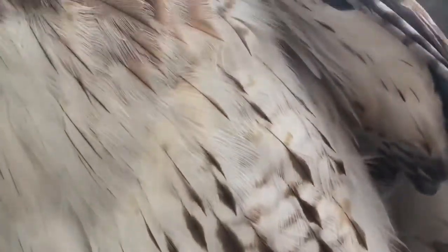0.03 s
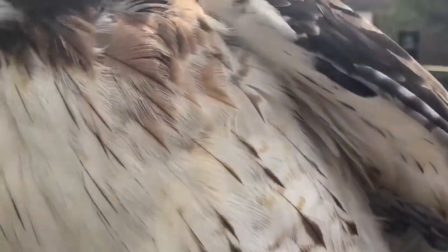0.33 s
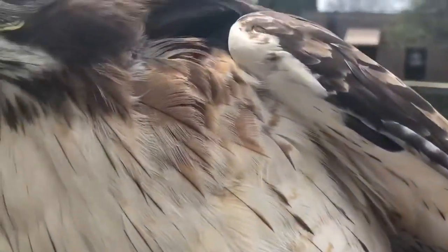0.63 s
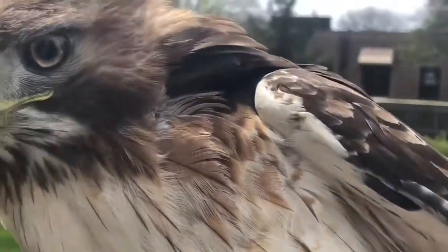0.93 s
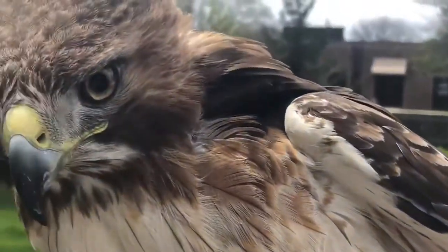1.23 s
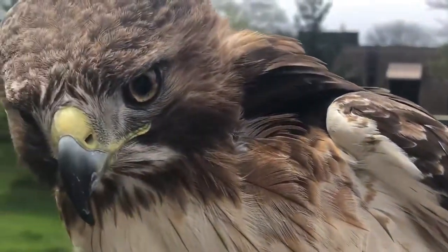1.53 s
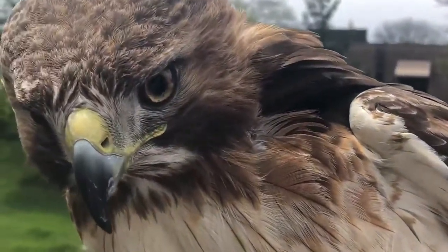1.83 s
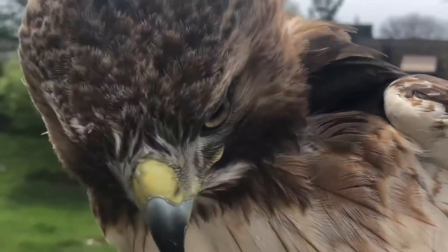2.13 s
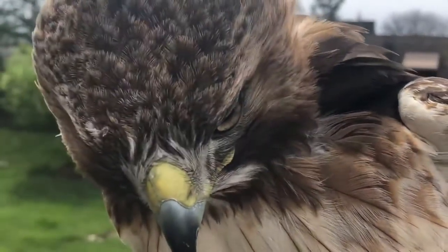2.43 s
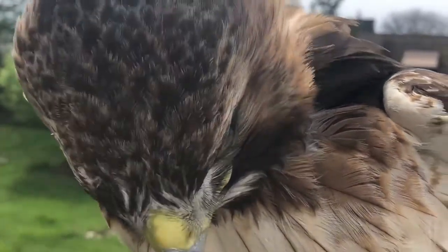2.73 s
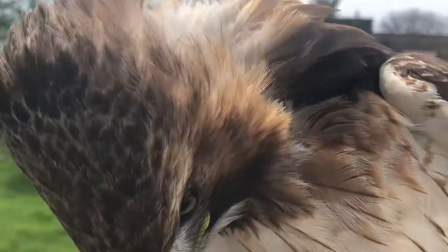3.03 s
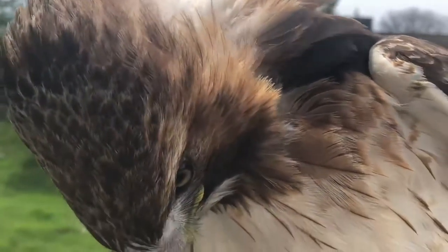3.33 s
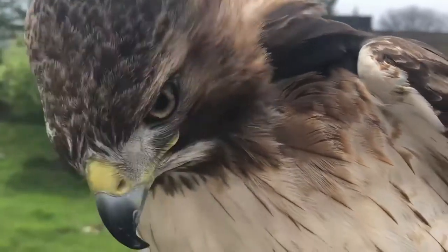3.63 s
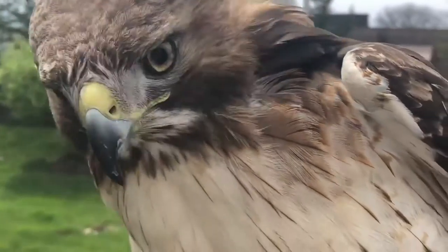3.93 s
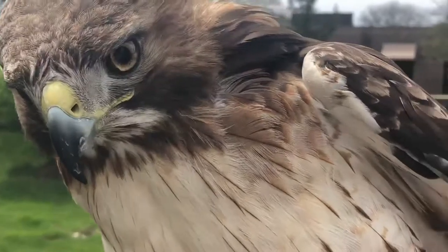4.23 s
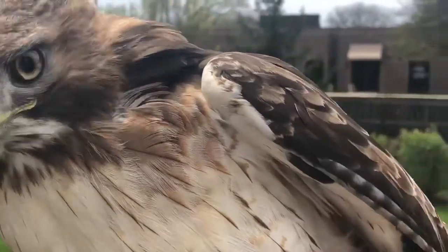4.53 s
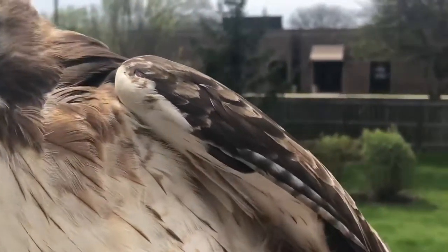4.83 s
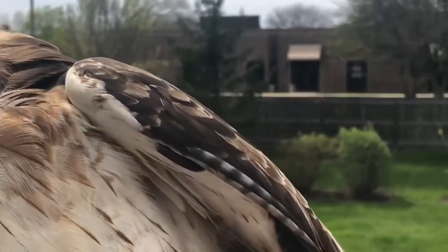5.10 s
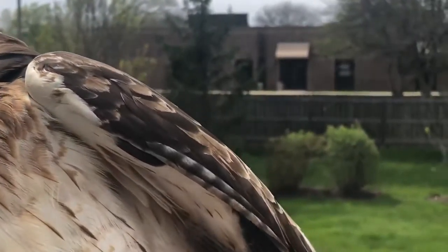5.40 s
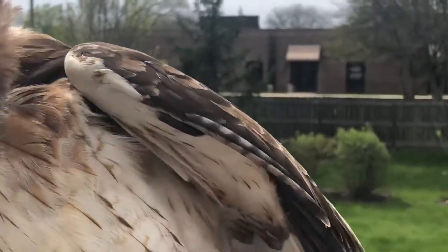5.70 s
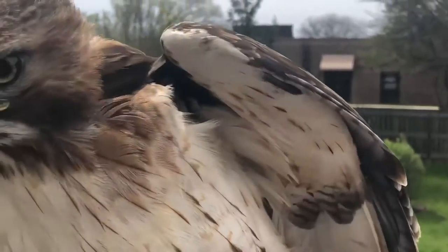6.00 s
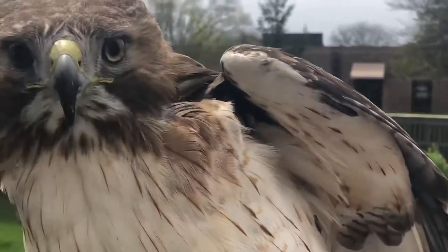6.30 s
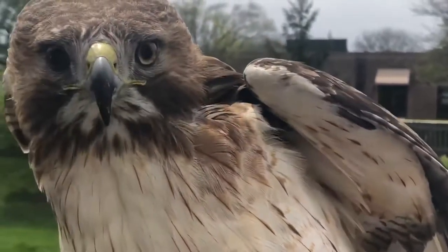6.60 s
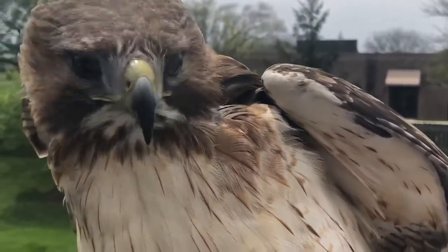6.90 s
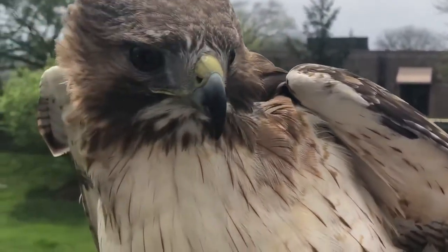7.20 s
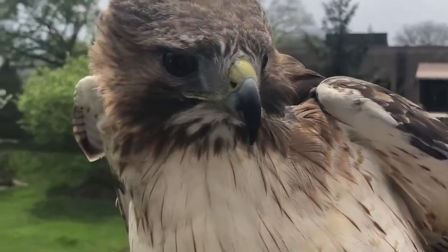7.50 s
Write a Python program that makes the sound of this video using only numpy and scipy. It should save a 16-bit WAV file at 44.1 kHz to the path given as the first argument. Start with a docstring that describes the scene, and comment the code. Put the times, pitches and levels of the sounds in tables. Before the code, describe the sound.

A steady low rumble of distant road traffic, with tyre hiss and a wavering engine drone, fills a back yard. Over it a sparrow gives quick, high chirps, three early and two more after a pause, with faint notes from other birds farther off. One dipping call follows late on. Soft thuds from the hand on the microphone come early and midway, and tiny ticks at the end.

```python
"""Sparrow in a back yard

Heard on a hand-held microphone, a sparrow repeats one quick run of slurred, whistled syllables;
the ground, a fence and houses answer. Softer notes fall between the chirps, small birds call farther
off, and one two-voiced call dips near the end. In the distance tyres hiss on a road and an engine
drones. Right at the microphone, the hand makes a few soft bumps and ticks."""
import sys
import numpy as np
from scipy import signal
from scipy.fft import rfft, irfft, next_fast_len
from scipy.io import wavfile
from scipy.ndimage import uniform_filter1d, map_coordinates

SR = 44100
rng = np.random.default_rng(int(sys.argv[2]) if len(sys.argv) > 2 else 0)


def store_wav(level_fs):
    """Save 16-bit WAV to argv[1]."""
    pcm = np.round(np.clip(np.atleast_2d(level_fs), -1, 1) * 32767)
    wavfile.write(sys.argv[1], SR, pcm.T.astype(np.int16))


N = 332955
TIME = np.arange(N) / SR


def amp(db):
    """Decibels to gain."""
    return 10 ** (np.asarray(db) / 20)


def unit(x):
    """Scaled to rms 1."""
    return x / np.sqrt(np.mean(x ** 2) + 1e-20)


def along(points, hz):
    """(frequency [Hz], value) points read on a log axis."""
    knots_hz, values = np.transpose(points)
    return np.interp(np.log(hz + 1), np.log(knots_hz + 1), values)


def curves(rows, t):
    """Each column after the time, read at the times t."""
    times, *columns = np.transpose(rows)
    return [np.interp(t, times, column) for column in columns]


def wobble(rate, size=N):
    """A smooth random curve, rate knots a second."""
    knots = rng.standard_normal(int(size * rate / SR) + 4)
    return map_coordinates(knots, [np.arange(size) * rate / SR])


def filtered(x, response):
    """x times a response of frequency."""
    size = next_fast_len(N + 8192)
    return irfft(rfft(x, size) * response(np.fft.rfftfreq(size, 1 / SR)), size)[:N]


def coloured(x, colour):
    """x shaped by (frequency [Hz], gain [dB]) points."""
    return filtered(x, lambda hz: amp(along(colour, hz)))


def noise(colour):
    """Noise of rms 1 with the given colour."""
    return unit(coloured(rng.standard_normal(N), colour))


def band(centre_hz, width_hz):
    """Noise of rms 1 in one bell-shaped band."""
    white = rng.standard_normal(N)
    return unit(filtered(white, lambda hz: np.exp(-.5 * ((hz - centre_hz) / width_hz) ** 2)))


def add(track, start, sound):
    """Mix a sound into the track, start seconds in."""
    at = round(start * SR) + np.arange(len(sound))
    inside = (at >= 0) & (at < N)
    track[at[inside]] += sound[inside]


# Colours of the road as heard from the yard: (frequency [Hz], relative level [dB])
RUMBLE_COLOUR = [(20, -35), (45, -8.5), (75, -2.5), (110, 1.5), (150, -3.5), (200, -9), (260, -9.5),
                 (340, -12.5), (450, -24.5), (800, -35.5), (2000, -63)]
ROAR_COLOUR = [(150, -20), (400, -4), (620, -3), (800, 0.5), (950, -1), (1300, -14), (2000, -22.5),
               (5000, -71)]
HISS_COLOUR = [(400, -29.5), (800, -7), (1100, 0.5), (1600, -5), (2100, -15), (3000, -20.5), (4200, -26.5),
               (6000, -32.5), (12000, -59)]
# Road rumble at the microphone: (time [s], level [dB])
RUMBLE_LEVELS = [(0, -43.5), (1.0, -44), (2.5, -45.7), (3.0, -42.5), (4.15, -45.5), (4.7, -42.5),
                 (5.75, -45.5), (6.15, -42.5), (7.55, -44.5)]
# Tyres at the microphone: (time [s], roar level [dB], hiss level [dB])
TYRE_LEVELS = [(0, -53.5, -55), (1.9, -52, -55), (2.75, -51.5, -53.5), (3.7, -52.5, -56.5),
               (5.5, -50.5, -56), (6.5, -52, -56.5), (7.05, -50, -57), (7.55, -52.5, -55)]

def traffic():
    """A distant road: rumble, tyre roar and tyre hiss, each wavering a little."""
    rumble_db, = curves(RUMBLE_LEVELS, TIME)
    roar_db, hiss_db = curves(TYRE_LEVELS, TIME)
    rumble = amp(rumble_db + .92 * wobble(6.2)) * noise(RUMBLE_COLOUR)
    roar = amp(roar_db + .71 * wobble(3.5)) * noise(ROAR_COLOUR)
    hiss = amp(hiss_db + .23 * wobble(8.9)) * noise(HISS_COLOUR)
    return rumble + roar + hiss


# The far engine speeds up: (time [s], length [s], pitch rise [Hz])
ENGINE_REVS = [(-.1, .98, 3.1), (1.268, .22, 2.6), (2.013, .17, 2.8), (2.973, .42, 4), (4.59, 3.1, 1.54),
               (5.549, .12, 1.2), (6.038, .38, 2.6)]
# The lower of its two hums: (time [s], level [dB])
HUM_LEVELS = [(0, -50), (1.7, -55.5), (2.3, -55), (4.4, -56), (5.2, -54.5), (7.55, -49)]

def engine(idle_hz=53.63, idle_db=-48, db_per_hz=1.37, ramp_s=.19):
    """A far engine idles and grows louder whenever it speeds up; two fuzzy hums lie above it."""
    rise_hz = np.zeros(N)
    for start, length, rev_hz in ENGINE_REVS:
        inside_s = np.minimum(TIME - start, start + length - TIME)
        rise_hz += rev_hz * np.clip(.5 + inside_s / ramp_s, 0, 1)
    phase = 2 * np.pi * np.cumsum(idle_hz + rise_hz) / SR + .81 * wobble(18)
    level = amp(idle_db + db_per_hz * rise_hz + 1.2 * wobble(7.7))
    drone = level * (np.sqrt(2) * np.sin(phase) + amp(-7) * band(56, 8.5))
    hum_db, = curves(HUM_LEVELS, TIME)
    return drone + amp(hum_db) * band(168.85, 4.2) + amp(-61) * band(240, 3.4)


# Background hiss of the yard: (frequency [Hz], relative level [dB])
AIR_COLOUR = [(500, 10), (5000, -6.5), (7000, 0.5), (10500, -0.5), (15500, -5)]

def air():
    """A faint, even hiss behind everything."""
    return amp(-76.5) * noise(AIR_COLOUR)


def note(length, start_hz, middle_hz, end_hz, fade_s=.005, fade_db=10):
    """One bend of pitch that swells, holds and fades: rows of (time [s], pitch [Hz], level [dB])."""
    progress = np.linspace(0, 1, num=40)
    bend = np.polyfit([0, .5, 1], [start_hz, middle_hz, end_hz], 2)
    t = progress * length
    opening = np.clip(np.minimum(t, length - t) / fade_s, 0, 1)
    return np.column_stack([t, np.polyval(bend, progress), fade_db * (opening - 1)])


def syrinx(contour, rough, ratio=1):
    """A bird's gliding whistle, fluttering more when rough; complex, so overtones can follow its phase."""
    start, end = contour[0][0], contour[-1][0]
    t = np.arange(start, max(end, start + .005), 1 / SR)
    hz, db = curves(contour, t)
    glide_hz = ratio * uniform_filter1d(hz, size=120)
    flutter = (.01 + .055 * rough) * wobble(900, len(t)) + .009 * wobble(110, len(t))
    phase = 2 * np.pi * np.cumsum(glide_hz * (1 + flutter)) / SR
    unsteady_db = (1.6 + 1.5 * rough) * wobble(420, len(t)) + 1.8 * wobble(70, len(t))
    soft_edges = signal.windows.tukey(len(t), min(1, 200 / len(t)))
    return np.sqrt(2) * amp(db - .7 + unsteady_db) * soft_edges * np.exp(1j * phase)


# The sparrow in the yard:
# (time [s], level [dB], second-half gain [dB], pitch [ratio], overtone gain [dB])
SPARROW_CHIRPS = [(-.021, -52.5, -5.5, 1.02, 1), (.724, -54.5, -9.5, 1.0, -2),
                  (1.549, -55.5, -4.5, 1.006, 4), (3.736, -55, -2.5, 1.0, 4),
                  (4.913, -55.5, -5.5, 1.02, -1)]
# Each chirp's thin lead-in, arch, shelf, downslur, rasp, rise and closing note:
# (time in chirp [s], length [s], start pitch [Hz], middle pitch [Hz], end pitch [Hz],
#  relative level [dB], roughness [0-1], overtone gain [dB])
CHIRP_SYLLABLES = [(-.022, .026, 6250, 6400, 6300, -20.5, .45, -40),
                   (.002, .031, 3950, 5100, 4100, -4.3, .2, -19.5),
                   (.030, .023, 4080, 4060, 3950, -3.5, .15, -23),
                   (.046, .018, 4050, 3680, 3200, -6.5, .5, -36),
                   (.062, .040, 3150, 3200, 3550, -12.5, .8, -29),
                   (.098, .035, 3500, 3780, 4330, -.5, .25, -37),
                   (.134, .020, 3520, 3300, 3230, -2.5, .25, -42)]
# The whistle dips, then strengthens at the top of its range: (frequency [Hz], gain [dB])
WHISTLE_RESPONSE = [(4900, 2.5), (5250, -1), (5550, 5), (6200, 5.5)]
# Beak resonances that colour the overtones: (frequency [Hz], gain [dB])
BEAK_RESPONSE = [(6000, 17), (7400, 8), (8200, 3.5), (9000, -3), (10300, 1), (11200, 10), (12100, 5),
                 (13200, -9), (16000, -14)]

def sparrow(ground_s=.0045, ground_db=-7.5):
    """Whistled syllables whose overtones glint in the beak; the ground bounce beats against the glides."""
    head_start_s = .05  # a chirp already under way still gets its echoes
    whistle, overtones = np.zeros((2, N))
    for start, chirp_db, second_half_db, ratio, bright_db in SPARROW_CHIRPS:
        for after, length, *pitches_hz, syllable_db, rough, overtone_db in CHIRP_SYLLABLES:
            second_half = np.interp(after + length / 2, [.06, .1], [0, 1])
            gain = amp(chirp_db + syllable_db + second_half_db * second_half)
            tone = gain * syrinx(note(length, *pitches_hz), rough, ratio)
            turn = np.exp(1j * np.angle(tone))
            harmonics = tone * (turn + turn ** 2)  # second and third
            onset = head_start_s + start + after
            add(whistle, onset, tone.imag)
            add(overtones, onset, amp(overtone_db + bright_db) * harmonics.imag)
    direct = coloured(whistle, WHISTLE_RESPONSE) + coloured(overtones, BEAK_RESPONSE)
    near = filtered(direct, lambda hz: 1 + amp(ground_db) * np.exp(-2j * np.pi * hz * ground_s))
    out = np.zeros(N)
    add(out, -head_start_s, near + yard(near))
    return out


# How long the yard rings: (frequency [Hz], time to fall 60 dB [s])
YARD_DECAY = [(200, 0.25), (3500, 0.47), (5500, 0.85), (12000, 0.064)]
# Fence and house walls, heard from the microphone: (delay [s], gain [dB])
WALL_ECHOES = [(.011, -17), (0.023, -16), (0.055, -11), (.064, -14.5)]

def yard(x, tail_db=-9.5, dull_hz=7000):
    """The yard's answer: a thin diffuse tail and a few dull echoes off the walls."""
    hz, t, spectrum = signal.stft(rng.standard_normal(SR // 2), SR, nperseg=256)
    decay = amp(-60 * t / along(YARD_DECAY, hz)[:, None])
    _, tail = signal.istft(spectrum * decay, SR, nperseg=256)
    out = amp(tail_db) * signal.fftconvolve(x, tail / np.linalg.norm(tail))[:N]
    dull = filtered(x, lambda hz: 1 / (1 + (hz / dull_hz) ** 4))
    for delay, db in WALL_ECHOES:
        add(out, delay, amp(db) * dull)
    return out


# Soft bumps on the microphone: (time [s], level [dB], pitch [Hz], length [s])
MIC_BUMPS = [(1.541, -29.5, 81, 0.02), (1.998, -32, 142.3, 0.032), (2.019, -29, 80, 0.039),
             (3.052, -32.5, 89, 0.027), (3.664, -36, 172, 0.02), (3.674, -31, 75, 0.025),
             (3.704, -33.5, 250, 0.015), (3.713, -29, 129, 0.015), (3.721, -33.5, 78.6, 0.037),
             (3.72, -44.5, 396, 0.025)]
# Ticks on the microphone: (time [s], level [dB], band centre [Hz])
MIC_TICKS = [(6.686, -66, 8690), (7.358, -67, 12400), (7.367, -68, 10500), (7.528, -66, 9400)]

def handling(tick_t60_s=.021):
    """The hand on the microphone makes short low thuds and tiny dry ticks."""
    out = np.zeros(N)
    for start, db, hz, length in MIC_BUMPS:
        t = np.arange(0, length, 1 / SR)
        swell = np.sin(np.pi * t / length)
        add(out, start, -amp(db) * swell * np.sin(2 * np.pi * hz * t))
    t = np.arange(SR // 30) / SR
    for start, db, hz in MIC_TICKS:
        add(out, start, amp(db - 60 * t / tick_t60_s) * band(hz, hz / 4)[:len(t)])
    return out


# Single notes around the yard:
# (time [s], length [s], start pitch [Hz], middle pitch [Hz], end pitch [Hz], level [dB])
SOFT_NOTES = [(2.58, 0.011, 2820, 3170, 3710, -62), (2.843, .055, 3048, 3950, 4400, -68),
              (2.864, .045, 3200, 3400, 4170, -65), (4.247, .022, 3650, 3980, 3970, -70)]

def soft_notes():
    """Quiet, fluttering upslurs between the chirps."""
    out = np.zeros(N)
    for start, length, *pitches_hz, db in SOFT_NOTES:
        add(out, start, amp(db) * syrinx(note(length, *pitches_hz), rough=.8).imag)
    return out


# Small birds far from the microphone: (time [s], length [s], level [dB])
DISTANT_CALLS = [(3.532, 0.14, -69.5), (4.639, .19, -69.5), (5.208, 0.098, -70.5)]

def far_birds():
    """Far chirps arrive smeared by scattering into a narrow rustle."""
    level = np.zeros(N)
    for start, length, db in DISTANT_CALLS:
        middle = start + length / 2
        level += amp(db) * np.exp(-2 * ((TIME - middle) / length) ** 2)
    return level * band(centre_hz=3460, width_hz=660)


# The two voices of one smooth call in the yard: (time [s], pitch [Hz], relative level [dB])
LOW_VOICE = [(6.195, 3450, -66), (6.204, 3980, -55), (6.214, 3700, -60), (6.226, 3080, -60),
             (6.241, 2930, -60), (6.253, 3200, -65), (6.263, 3850, -56), (6.272, 4000, -56),
             (6.284, 3600, -67)]
HIGH_VOICE = [(6.170, 3800, -73), (6.188, 4120, -61), (6.206, 4500, -58), (6.218, 4100, -62),
              (6.228, 3600, -66), (6.241, 3470, -73), (6.254, 3700, -65), (6.270, 4300, -62),
              (6.282, 4100, -72)]

def dipping_call(throat_hz=6400, throat_width_hz=450):
    """Both voices dip together; their sum tone and the low voice's octave ring in a throat resonance."""
    low, high = np.zeros((2, N), complex)
    add(low, LOW_VOICE[0][0], syrinx(LOW_VOICE, rough=.032))
    add(high, HIGH_VOICE[0][0], syrinx(HIGH_VOICE, rough=.03))
    sum_tone = low * np.exp(1j * np.angle(high))
    octave = amp(-3) * low * np.exp(1j * np.angle(low))
    overtones = (sum_tone + octave).imag
    throat = filtered(overtones, lambda hz: 1 / (1 + ((hz - throat_hz) / throat_width_hz) ** 2))
    return amp(-5) * (low + high).imag + amp(-11.5) * throat


def scene():
    """One microphone in the yard: birds in front, road and engine far behind."""
    calls = soft_notes() + dipping_call()
    birds = sparrow() + calls + amp(-4) * yard(calls) + far_birds()
    return (birds + traffic() + engine() + handling() + air())[None]


def record(dry, top_hz=15700):
    """The recorder keeps nothing above its band limit."""
    return filtered(dry[0], lambda hz: hz < top_hz)[None]


dry = scene()
out = record(dry)
store_wav(out)
```